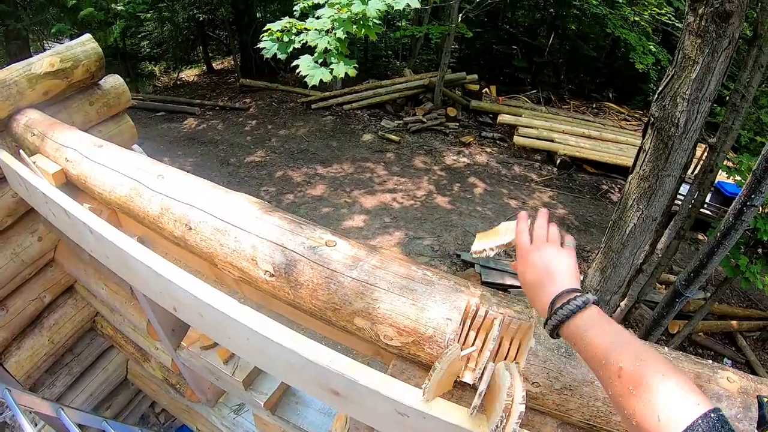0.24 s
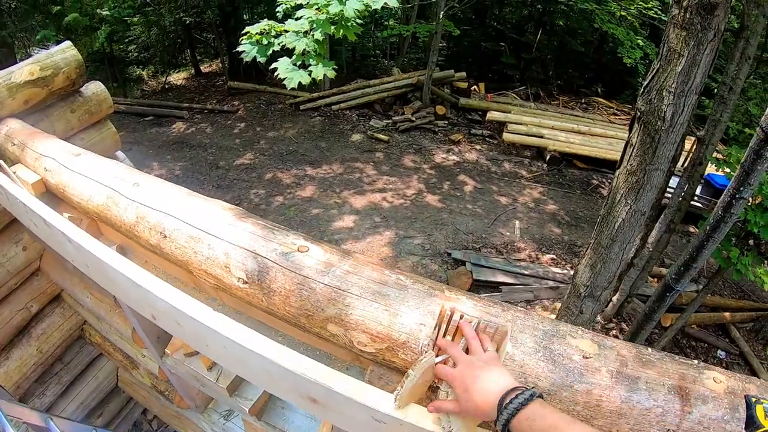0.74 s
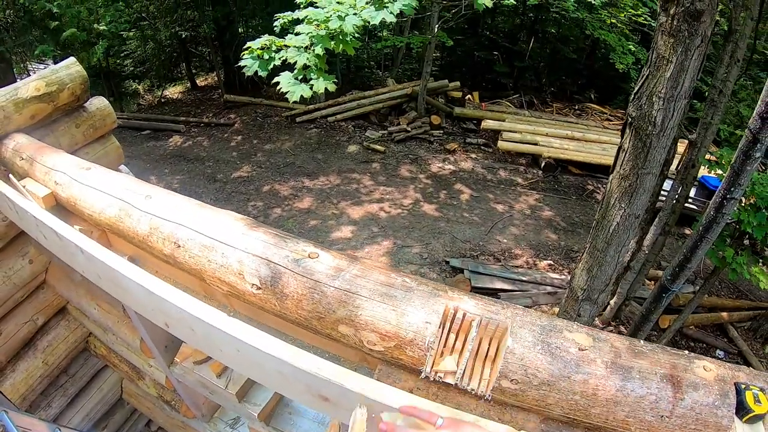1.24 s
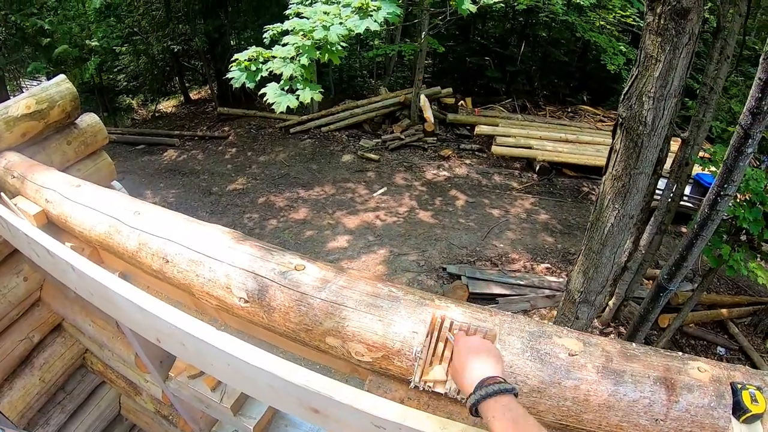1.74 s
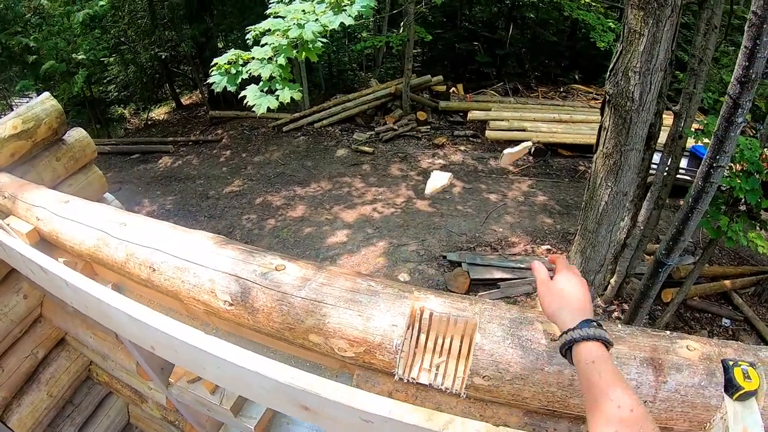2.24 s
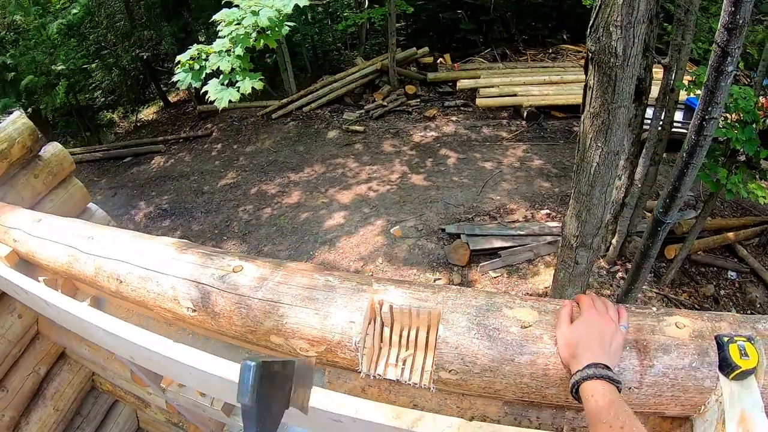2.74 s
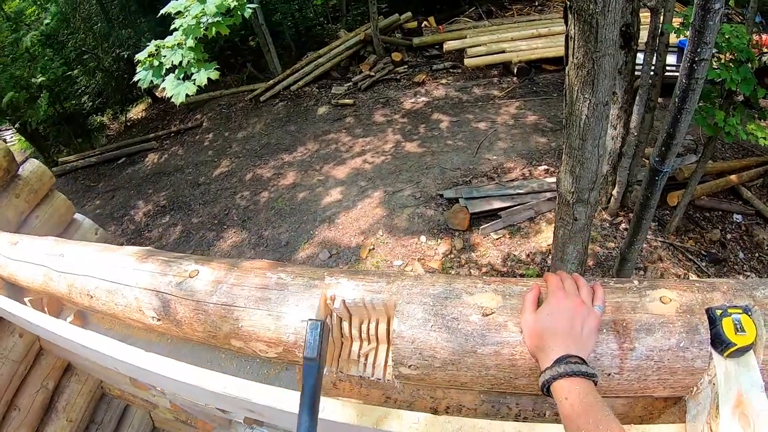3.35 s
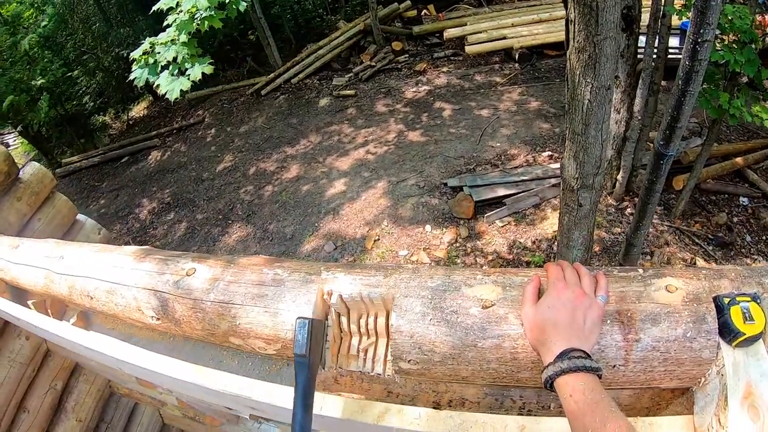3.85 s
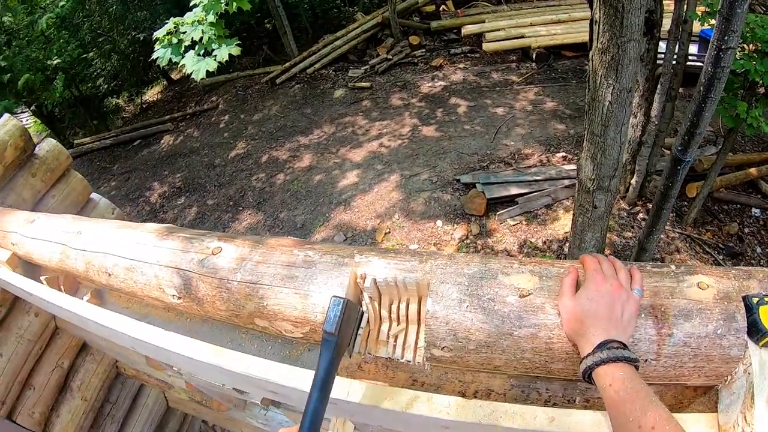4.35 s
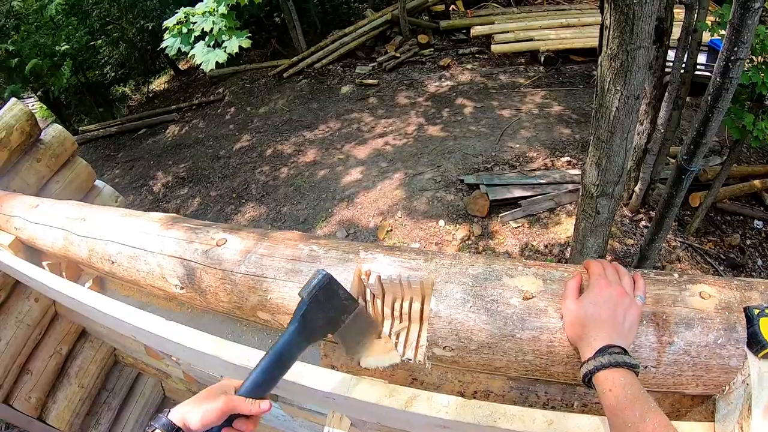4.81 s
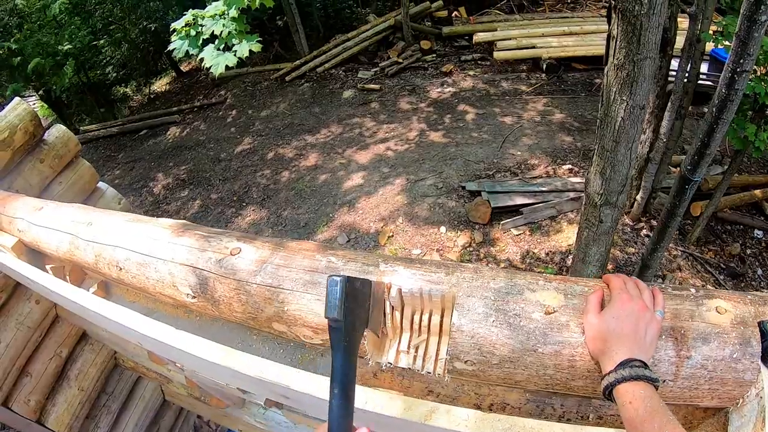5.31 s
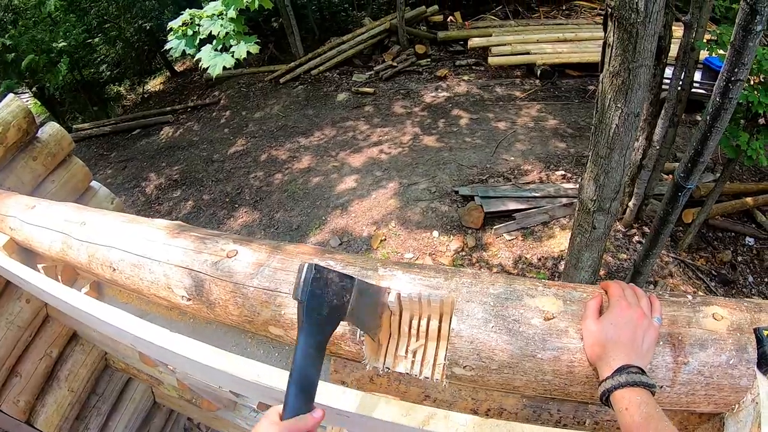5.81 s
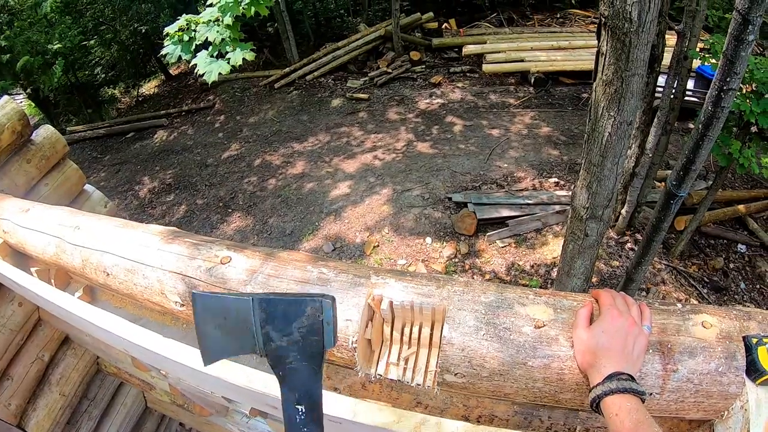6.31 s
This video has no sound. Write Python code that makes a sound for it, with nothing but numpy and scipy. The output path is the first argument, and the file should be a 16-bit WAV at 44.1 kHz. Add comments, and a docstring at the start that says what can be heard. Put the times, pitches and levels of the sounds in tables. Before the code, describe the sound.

Wood chips are tugged and snapped from a notched log, then a hatchet knocks, pries and cracks fibres, outdoors in a quiet yard.

```python
"""A hatchet knocks and levers blocks of wood out from between saw cuts in a log, an arm's length from a worn camera.
Fibres snap as short bursts of noise with close ringing modes; blows thump as decaying clatter and log modes.
Hand and blade scrape as grainy noise in swelling strokes, with creaks, splinter ticks and a faint steel ring.
Timber, log walls and trees return a faint noise-tail echo over quiet outdoor air with a low distant hum."""
import sys
import numpy as np
from scipy import signal
from scipy.fft import rfft, irfft
from scipy.io import wavfile
from scipy.ndimage import uniform_filter1d, minimum_filter1d

SR = 44100
rng = np.random.default_rng(int(sys.argv[2]) if len(sys.argv) > 2 else 0)


def transcribe(u):
    """Save the signal u as a 16-bit wav file named by the first command-line argument.

    u: samples, shape (n,) or (channels, n), limited to [-1, 1]; the rate is SR.
    q: integer samples, one column per channel.
    """
    v = np.clip(np.atleast_2d(u).T, -1, 1)
    q = np.round(v * 32767).astype(np.int16)
    wavfile.write(sys.argv[1], SR, q)


N = 289737

# Single snaps of wood and knocks of loose chips, close by; levels are rms over the first 4 ms.
# Each row: start in seconds, level in dB, ring in Hz, ring share 0-1 (capped at 0.6),
# tilt in dB per octave, left minus right in dB.
SNAPS = [(0.278, -33, 930, 0.8, -6, -9), (0.584, -45.5, 1350, 0.3, -2, -8),
         (0.929, -38, 920, 0.65, -4.5, -10), (1.17, -36.5, 1340, 0.1, -20, -20),
         (1.4617, -8.5, 784, 0.8, -17, -14), (1.9096, -21, 1160, 0.1, -14, -6),
         (1.9122, -16, 910, 0, 1.5, -2), (1.9658, -27.5, 3130, 0.34, -1.5, -1),
         (1.991, -19.5, 1080, 0.4, -9, -6), (2.0256, -16.5, 1650, 0.02, -2.5, -5),
         (2.028, -8, 1206, 0.7, -7.5, -4), (2.7505, -26.5, 1050, 0.06, -8, -2),
         (2.91, -31, 1010, 0.2, -12.5, -6), (3.191, -25, 1210, 0.55, -10, -7),
         (3.364, -37.5, 1750, 0.4, -8, 3), (3.408, -28, 2120, 0, 1.5, -2),
         (3.718, -41.5, 1210, 0.35, 2.5, -2), (3.923, -14.5, 1230, 0.05, -3, -1.5),
         (4.109, -26.5, 3170, 0.37, 16.5, -5), (4.174, -15, 3470, 0.13, 6, -3),
         (4.1904, -23, 1390, 0.12, -5.5, 3), (4.201, -19, 1280, 0.53, 9.5, -2),
         (4.3301, -28.5, 2980, 0.2, -1, 0), (4.3996, -19, 3580, 0.46, 12, -2),
         (4.4575, -37.5, 910, 0.22, 1, -3), (4.551, -41.5, 1130, 0, -3, 1),
         (4.568, -39.5, 730, 0.27, -11, -3), (4.686, -17, 3850, 0.2, 2.5, 0), (4.712, -22, 1730, 0, -6, 2),
         (4.734, -26, 4410, 0.7, 8, 0), (4.822, -24.5, 3130, 0.7, 6.5, 14), (4.964, -31, 2030, 0.58, 0, -1),
         (5.283, -46.5, 1103, 0.4, 1.5, -2), (5.399, -30, 3730, 0.57, -2.5, -3),
         (5.4294, -30.5, 1155, 0.13, -7.5, -9), (5.55, -46, 3320, 0.7, -1.5, -2),
         (5.72, -21.5, 3580, 0.65, 3, -3.5), (5.735, -19, 3710, 0.8, 1, -4),
         (5.804, -29, 3220, 0.66, -2.5, -5), (6.16, -45, 1360, 0.04, -1, -2),
         (6.447, -38, 2010, 0.23, -6.5, -6)]
# A run of fibres tears as the wood is levered. Each row: start in seconds, length in seconds,
# level in dB, ring in Hz, ring share 0-1 (capped at 0.6), tilt in dB per octave.
TEARS = [(0.232, 0.023, -26.5, 980, 0.63, 1.5), (4.1188, 0.0055, -20.5, 5020, 0.18, 6.5),
         (4.1326, 0.0098, -19.5, 4210, 0.3, 6), (4.152, 0.022, -26, 4460, 0.56, 5),
         (4.392, 0.02, -22.5, 3180, 0.27, 1.5), (4.818, 0.015, -16.5, 3520, 0.54, 6),
         (5.712, 0.018, -21, 3550, 0.87, 3.5), (5.744, 0.0044, -30, 2270, 0.4, 5)]
# Hard knocks of blade or block on wood that carry across the yard. Each row: columns as in SNAPS.
CLACKS = [(2.4945, -17, 1900, 0.6, 2.5, -1), (2.64, -32, 1540, 0.15, -1, 0),
          (3.337, -37, 2720, .05, 11.5, 0), (6.2581, -18, 2490, 0.33, 6, -6.5)]
# Dry wood singing on after a hard knock. Each row: mode in Hz, level in dB re the knock, t60 in seconds.
CLACK_MODES = [(2350, -12, 0.21), (2610, -19, 0.23), (3060, -25.5, 0.55), (3260, -32, 0.84)]
# Colour of a snap. Each row: frequency in Hz, relative density in dB per Hz.
SNAP_COLOUR = [(150, -54.5), (500, -26), (800, -6.5), (1250, 4.5), (2200, 2), (3600, 3), (5000, -3),
               (7200, -12.5), (9000, -13.5), (11500, -25), (16000, -38)]
# Colour of a hard knock. Each row: frequency in Hz, relative density in dB per Hz.
CLACK_COLOUR = [(300, -16), (1200, 2.5), (2700, 5), (3600, 0.5), (6300, -15), (10000, -37.5), (14000, -64)]
# Blows that shake the log. Each row: start in seconds, body level in dB, knock level in dB re the body,
# basic t60 in seconds (each band scales it).
THUMPS = [(0.411, -41.5, 5, 0.5), (0.655, -45, 8.5, 0.45), (1.074, -46, 1, 0.67), (1.356, -54.5, 9, 0.1),
          (1.4599, -16, -8, 0.16), (1.496, -29, -9, 0.4), (2.025, -25, -6, 0.22),
          (2.308, -43.5, -22, 0.088), (2.4116, -50.5, -0.5, 0.023), (2.6375, -49, 6, 0.026),
          (2.749, -44, 8.5, 0.062), (3.187, -42.5, -2.5, 0.67), (3.2652, -40, -8, 0.91),
          (3.757, -39, -2, 0.24), (3.924, -36, -9.5, 0.61), (4.194, -44.5, 2.5, 0.67),
          (4.33, -37.5, -14.5, 0.45), (4.371, -32.5, -4.5, 0.63), (4.487, -48, -1, 0.62),
          (4.684, -48.5, 10, 0.56), (4.8, -24.5, -3, 0.36), (5.209, -66, 14, 0.16), (5.427, -51.5, 6, 0.88),
          (5.581, -47, -25, 0.09), (5.774, -29, -6.5, 0.46), (5.912, -32, -11.5, 0.21),
          (6.157, -43, -9, 0.53), (6.255, -41, -1, 0.24)]
# The log and its supports. Each row: mode in Hz, relative level in dB, t60 in seconds.
LOG_MODES = [(64, 4.5, 0.066), (124.1, 2, 0.3), (157.7, -1, 0.43), (204.3, 7, 0.16), (217.6, 3.5, 0.29),
             (268, 8.5, 0.084), (322.3, -2, 0.33), (366, 5, 0.071), (479.5, 6, 0.11), (622.5, -0.5, 0.19),
             (839.5, -1, 0.11)]
# Deep boom of the log on its supports. Each row: body level in dB, boom level in dB.
BOOM = [(-66, -75.5), (-39, -61.5), (-33, -39.5), (-25.5, -44.5), (-27, -32.5)]
# The log rocks on its supports after a heavy heave. Each row: start in seconds, length in seconds, level in dB.
ROCKS = [(4.821, 0.27, -54), (5.805, 0.098, -36.5), (5.882, 0.19, -50)]
# Strokes of hand and blade over the wood. Each row: start in seconds, length in seconds, level in dB,
# hiss in dB re that level, hollow low range in dB re that level.
STROKES = [(0, 0.015, -45, -13.5, -0.5), (0.061, 0.25, -45, -10, 2.5), (0.37, 0.013, -40.5, -3.5, -6),
           (0.606, 0.38, -50, -9, 2), (0.819, 0.15, -44.5, -17, 0), (0.973, 0.12, -43, -9.5, -1),
           (1.137, 0.11, -46.5, -8.5, -5), (1.496, 0.66, -44, -12, -7.5), (1.926, 0.087, -42, -13, 4.5),
           (1.974, 0.48, -46, -17, -3.5), (2.495, 0.22, -53, 4, 2.5), (2.807, 0.33, -54.5, -7.5, 3),
           (3.157, 0.18, -54, -12, 3), (3.322, 0.061, -42.5, -9, -3.5), (3.413, 0.024, -39, -3, -6),
           (3.474, 0.071, -49.5, -4.5, 0.5), (3.568, 0.96, -59, 0.5, -5), (3.846, 0.089, -43, -7, -2.5),
           (4.288, 0.03, -38, -10, -5), (4.588, 0.36, -43, -13, -3), (5.033, 0.043, -48, -18, -25),
           (5.389, 0.064, -51.5, -29, 9), (5.555, 0.014, -55, -5, -3), (5.627, 0.037, -51, -15, -13),
           (5.749, 0.056, -47, -12, 8.5)]
# Colour of the rasp. Each row: frequency in Hz, relative density in dB per Hz.
RUB_COLOUR = [(50, -30.5), (160, 5.5), (900, 3.5), (2300, -2.5), (3500, -2.5), (4800, -7.5), (6500, -16.5),
              (10000, -41)]
# Colour of the hiss of sliding. Each row: frequency in Hz, relative density in dB per Hz.
HISS_COLOUR = [(2500, -7.5), (5000, 1.5), (6000, 1.5), (9300, 0.5), (11200, -13), (16000, -27)]
# Resonances of a block drawn out of its cut. Each row: centre in Hz, width in Hz, relative level in dB.
BLOCK = [(920, 550, 8.5), (1410, 330, 3.5), (2160, 240, 1.5), (3560, 1900, 1.5)]
# The wedged blade grinds in uneven slips. Each row: start in seconds, length in seconds, level in dB,
# lower resonance in Hz, upper resonance in Hz.
CREAKS = [(3.499, 0.061, -56, 1090, 3270), (3.659, 0.075, -54.5, 1190, 3400),
          (5.775, 0.0636, -39, 3220, 4100)]
# Faint ring of the steel head. Each row: mode in Hz, level in dB before swell and decay, t60 in seconds.
HEAD_MODES = [(2140, -43, 0.91), (2860, -53.5, 1.9)]
# Colour of the echo. Each row: frequency in Hz, gain in dB.
ECHO_COLOUR = [(60, -12), (200, -4.5), (1500, -4.5), (3000, -7.5), (14000, -12.5)]
# Colour of the outdoor air. Each row: frequency in Hz, relative density in dB per Hz.
AIR_COLOUR = [(25, 3.5), (90, -18), (200, 7), (1000, -13.5), (3200, -12), (10000, -26), (15000, -70.5)]
# Distant hum. Each row: time in seconds, level in dB.
HUM = [(.3, -51.5), (1.2, -58.5), (3, -68.5)]
# How unlike the two microphone ports hear a sound. Each row: frequency in Hz, side minus mid in dB.
WIDTH = [(60, -13.5), (250, -18.5), (700, -6), (1400, -2), (3000, -10.5), (5000, -6.5), (8000, 2),
         (15000, 2.5)]

STROKE_SWELL, STROKE_T60_S = 0.32, 0.21  # share of its length over which a stroke swells; release
LEAD_DB, LEAD_RISE_S = -22.5, 0.064  # short soft swell of noise leading into a snap, re the snap; 60 dB rise
DRAG_DB, DRAG_T60_S = -5, 0.33  # scrape after a blow, re its knock
PULL_END_S, PULL_DB = 0.2456, -26.5  # a block comes free of its saw cut
PULL_RISE_S, PULL_T60_S = 0.25, 0.048  # rise and release over 60 dB
LIFT_AT_S = 2.754  # the hatchet is picked up
TOP_HZ = 16000  # highest frequency the camera keeps


def snaps(table, spectrum, break_db, ring_length, t60_s, halving_db, mode_spread=0.067, size=4096):
    """Wood gives way in a few ms, the freed piece rings in close modes; returns near sound and what carries afar."""
    near, afar = np.zeros((2, N)), np.zeros((2, N))
    t = np.arange(size) / SR
    span = .004  # seconds over which the level is set
    for s, db, hz, share, tilt, pan_db in table:
        # the harder the break, the sooner it is over; t60_s holds at -11.5 dB
        t60 = t60_s * .5 ** ((db + 11.5) / halving_db)
        octaves = np.log2(np.clip(freqs(size), 600, 8000) / 2500)
        colour = gains(spectrum, size) * undb(tilt * octaves)
        # tearing has a bounded force, so the burst is dense rather than spiky
        tear = np.tanh(noise(size)) * (fade(t, t60) + undb(break_db) * fade(t, span))
        crack = opening(shape(tear, colour), span)
        detune = np.array([[-1], [0], [1]]) + rng.uniform(-0.59, 0.69, (3, 1))
        modes = hz * (1 + mode_spread * detune)
        ring = np.sin(2 * np.pi * modes * t).sum(axis=0) * fade(t, t60 * ring_length)
        ring = opening(band(ring, 280, 6400), span)
        share = np.clip(share, 0, .6)
        piece = opening(np.sqrt(1 - share) * crack + np.sqrt(share) * ring, span)
        add(near, s, undb(db) * pan(pan_db) * piece)
        # summed over all directions, only the broad colour is left
        pulse = opening(shape(signal.unit_impulse(size), colour), span)
        add(afar, s, undb(db) * pulse[None])
    return near, afar


def tears(edge_db=-4, scatter_db=-3.0, jitter_s=.0004, pitch_spread=0.013, pan_db=0.0, pan_spread_db=3, count=4):
    """Fibres give way one after another, on average hardest in the middle of the run; rows as in SNAPS."""
    rows = []
    for s, length, db, hz, share, tilt in TEARS:
        fibres = rng.standard_normal((count, 4))
        for along, (late, loud, pitch, side) in zip(np.linspace(0, 1, count), fibres):
            start = s + along * length + jitter_s * late
            level = db + edge_db * (2 * along - 1) ** 2 + scatter_db * loud
            ring_hz = hz * (1 + pitch_spread * pitch)
            rows.append((start, level, ring_hz, share, tilt, pan_db + pan_spread_db * side))
    return rows


def singing(spread=0.012):
    """Each hard knock leaves close pairs of modes ringing, a little different from spot to spot."""
    out, t = np.zeros((2, N)), np.arange(SR // 2) / SR
    for s, knock_db, *_ in CLACKS:
        pairs = rng.standard_normal((len(CLACK_MODES), 2, 1))
        for (hz, db, t60), pair in zip(CLACK_MODES, pairs):
            ring = np.sin(2 * np.pi * hz * (1 + spread * pair) * t).mean(axis=0) * fade(t, t60)
            add(out, s, undb(knock_db + db) * ring[None])
    return out


def thumps(modes_db=1.5, knock_length=0.7, boom_length=1.24, knock_pan_db=-4,
           punch_db=4, punch_hz=200, punch_t60=0.17, size=22050):
    """Each blow shoves the log, then rings its modes amid a dense dull clatter that dies sooner in higher bands."""
    out, t = np.zeros((2, N)), np.arange(size) / SR
    span = .04  # seconds over which the level is set
    punch = opening(band(np.sin(2 * np.pi * punch_hz * t) * fade(t, punch_t60), 74, 1000), span)
    for s, body_db, knock_db, t60 in THUMPS:
        boom_db = np.interp(body_db, *np.transpose(BOOM))
        # every blow lands on another spot, so the modes answer in other proportions
        spot = rng.standard_normal((len(LOG_MODES), 2))
        ring = np.zeros(size)
        for (hz, db, decay), (louder, higher) in zip(LOG_MODES, spot):
            mode_hz = hz * (1 + 0.013 * higher)
            ring += undb(db + louder) * np.sin(2 * np.pi * mode_hz * t) * fade(t, decay)
        # a gentle blow lands softly and swells over a few ms
        rise = np.minimum(t / np.interp(body_db, [-42, -25], [.005, .001]), 1)
        clatter, ring = noise(size) * rise, ring * rise
        # boom, body, knock: low Hz, high Hz, level dB, share of t60, left minus right dB
        bands = ((50.3, 157, boom_db, boom_length, 0.018),
                 (143.0, 419, body_db, 0.76, 0.0087),
                 (409, 834, body_db + knock_db, knock_length, knock_pan_db))
        for lo, hi, db, length, pan_db in bands:
            part = opening(band(clatter * fade(t, t60 * length), lo, hi, order=3), span)
            part = part + undb(modes_db) * opening(band(ring, lo, hi, order=3), span)
            add(out, s, undb(db) * pan(pan_db) * opening(part, span))
        # the shove grows faster than the ringing, so only heavy blows punch
        add(out, s, undb(2.04 * body_db + punch_db) * punch[None])
    return out


def rocking(lo_hz=36, hi_hz=92):
    """A deep rumble swells and settles as the log rolls a little on its supports."""
    out = np.zeros((2, N))
    for s, length, db in ROCKS:
        n = int(length * SR)
        rumble = unit(band(noise(SR), lo_hz, hi_hz)[:, -n:])
        add(out, s, undb(db) * rumble * signal.windows.tukey(n, .5))
    return out


def sliding(drag_hiss_db=-12):
    """Strength over time of rasp, hiss and hollow range: strokes, lead-in before a snap, drag after a blow."""
    t = np.arange(N) / SR
    rasp, hiss, hollow, extra = np.zeros((4, N))  # powers, so that overlapping strokes add up
    for s, length, db, hiss_db, hollow_db in STROKES:
        swell = np.clip((t - s) / (STROKE_SWELL * length), 0, 1)
        stroke = undb(db) * swell * fade(np.clip(t - s - length, 0, 1), STROKE_T60_S)
        rasp += stroke ** 2
        hiss += (undb(hiss_db) * stroke) ** 2
        hollow += (undb(hollow_db) * stroke) ** 2
    for s, db, *_ in SNAPS:
        before = (t < s) & (t > s - LEAD_RISE_S)
        extra[before] += (undb(db + LEAD_DB) * fade(s - t[before], LEAD_RISE_S)) ** 2
    for s, body_db, knock_db, _ in THUMPS:
        after = (t > s) & (t < s + DRAG_T60_S)
        extra[after] += (undb(body_db + knock_db + DRAG_DB) * fade(t[after] - s, DRAG_T60_S)) ** 2
    return np.sqrt(rasp + extra), np.sqrt(hiss + undb(drag_hiss_db) ** 2 * extra), np.sqrt(hollow + extra)


def catches(clump_db=2.5):
    """Uneven grip of a sliding surface, in dB: it changes every few ms and clumps over the ridges of the wood."""
    quick = 2.4 * wander(count=800)
    return quick + clump_db * wander(count=120)


def rubbing(level, hiss, hollow, grain_db=2.5, patch_db=1.5, pan_db=-3.0):
    """Skin and steel slide over rough grain: tiny uneven slips merge into a rasp that catches and frees."""
    slips = np.repeat(np.minimum(rng.exponential(size=N // 32 + 1), 4), 32)[:N]
    grain = undb(grain_db * slips + catches())
    # the point of contact moves, so each range of the wood swells on its own
    edges = (50, 400, 600, 850, 1200, 1700, 2400, 3200, 4200, 12000)  # Hz
    ranges = []
    for lo, hi in zip(edges, edges[1:]):
        patch = undb(patch_db * wander(count=330))
        ranges.append(band(noise(N) * grain * patch, lo, hi, order=3))
    halves = np.array([sum(ranges[:4]), sum(ranges[4:])])  # below and above 1200 Hz
    low, high = shape(halves, gains(RUB_COLOUR, N))
    rasp = (hollow * low + level * high) / np.std(low + high)
    fizz = unit(shape(noise(N) * grain, gains(HISS_COLOUR, N)))
    return pan(pan_db) * (rasp + hiss * fizz)


def pull(slip_db=0.5, hiss_db=-17, pan_db=-5.5):
    """The block judders along the saw cut; each slip rings it, louder and louder until it comes free."""
    t = np.arange(N) / SR - PULL_END_S
    slips = np.repeat(np.minimum(rng.exponential(size=N // 48 + 1), 3), 48)[:N]
    force = noise(N) * undb(slip_db * slips)
    ring = np.zeros((2, N))
    for hz, width, db in BLOCK:
        ring += undb(db) * unit(band(force, hz - width / 2, hz + width / 2))
    fizz = unit(shape(force, gains(HISS_COLOUR, N)))
    effort = fade(np.maximum(-t, 0), PULL_RISE_S) * fade(np.maximum(t, 0), PULL_T60_S)
    return undb(PULL_DB) * pan(pan_db) * effort * (unit(ring) + undb(hiss_db) * fizz)


def creaks(slip_hz=105, uneven_db=5, slip_t60=0.027, width=0.095, pan_db=-2):
    """Steel sticks and slips in the cut; every slip is a gritty puff into two resonances of the wood."""
    out = np.zeros((2, N))
    for s, length, db, *resonances in CREAKS:
        n = int(length * SR)
        rate = slip_hz * undb(uneven_db * wander(count=600)[:n])
        turn = np.cumsum(rate) / SR % 1  # progress from one slip to the next
        force = noise(SR)[:, :n] * fade(turn / slip_hz, slip_t60) * signal.windows.tukey(n, .2)
        force = np.pad(force, ((0, 0), (0, n)))  # room to ring out
        ring = sum(opening(band(force, hz * (1 - width), hz * (1 + width)), length) for hz in resonances)
        add(out, s, undb(db) * pan(pan_db) * opening(ring, length))
    return out


def crumbs(level, most_db=-43, least_db=-6, range_db=10, count=280):
    """Tiny splinters tick under the sliding hand and blade, louder the harder they rub, up to a limit; SNAPS rows."""
    when, loud, pitch = rng.random((count, 3)).T
    rub_db = 20 * np.log10(level[(when * N).astype(int)] + 1e-9)
    tick_db = np.minimum(rub_db, most_db) + least_db + range_db * loud ** 2
    ring_hz = 700 * 5 ** pitch
    return [(s, db, hz, .5, -3, -2) for s, db, hz in zip(when * N / SR, tick_db, ring_hz)]


def steel(waver_hz=75, swell_s=0.13, waver_db=-2.0, size=44100):
    """The hatchet head rings on faintly after it is lifted, as narrow noise bands wavering as it moves."""
    out, t = np.zeros((2, N)), np.arange(size) / SR
    for hz, db, t60 in HEAD_MODES:
        waver = undb(waver_db * wander(count=150)[:size])
        ring = unit(band(noise(size), hz - waver_hz, hz + waver_hz) * waver)
        add(out, LIFT_AT_S, undb(db) * ring * np.minimum(t / swell_s, 1) * fade(t, t60))
    return out


def yard(x, near_db=-13, near_t60=0.26, wall_s=0.018, wall_db=-14, wall_t60=0.036,
         far_db=-15, far_t60=0.61, treble_t60=0.31, size=52920):
    """Scatter from the timber close by, a bounce off wall and ground, then the tail from the trees."""
    t = np.arange(size) / SR
    near = noise(size) * fade(t, near_t60) * (t > .003)
    wall = noise(size) * fade(np.abs(t - wall_s), wall_t60) * (t > wall_s)
    trees = noise(size)
    far = band(trees, 57, 8700) * fade(t, far_t60) + band(trees, 4500, 10000) * fade(t, treble_t60)
    far = far * np.minimum(t / 0.007, 1)
    # the levels balance the three parts before the echo's colour is laid on
    echo = undb(near_db) * unit(near) + undb(wall_db) * unit(wall) + undb(far_db) * unit(far)
    echo = shape(echo / np.sqrt(size), gains(ECHO_COLOUR, size))
    return signal.fftconvolve(x.mean(axis=0)[None], echo, axes=1)[:, :N]


def outdoors(air_db=-63, hum_hz=164.2, upper_hz=217.6, upper_db=-67, waver=0.008, flutter_db=2.0):
    """Still air among trees, with two slightly wavering tones of a machine far off."""
    air = unit(shape(noise(N), gains(AIR_COLOUR, N)))
    clock = np.cumsum(1 + waver * wander(count=30)) / SR  # shared by both tones
    hum = unit(np.sin(2 * np.pi * hum_hz * clock) * undb(flutter_db * wander(count=60)))
    upper = unit(np.sin(2 * np.pi * upper_hz * clock) * undb(flutter_db * wander(count=60)))
    hum_db = np.interp(np.arange(N) / SR, *np.transpose(HUM))
    return undb(air_db) * air + undb(hum_db) * hum + undb(upper_db) * upper


def noise(n):
    """Noise at the two microphone ports: a common mid plus an opposed side, balanced per frequency by WIDTH."""
    mid, side = rfft(rng.standard_normal((2, n)))
    w = gains(WIDTH, n)
    return irfft(np.array([mid + w * side, mid - w * side]) / np.sqrt(1 + w ** 2), n)


def wander(count):
    """A slow random curve of spread near 1 through count random points."""
    return np.interp(np.arange(N), np.linspace(0, N, count), rng.standard_normal(count))


def undb(db):
    """Decibels to gain."""
    return 10 ** (np.asarray(db) / 20)


def unit(x):
    """Scale to rms 1."""
    return x / np.sqrt(np.mean(x ** 2) + 1e-20)


def opening(x, span):
    """Scale so that the first span seconds have rms 1."""
    return x / np.sqrt(np.mean(x[..., :int(span * SR)] ** 2) + 1e-20)


def fade(t, t60):
    """Exponential decay, 60 dB down after t60 (at least 1 ms)."""
    return np.exp(-np.log(1000) * t / max(t60, 1e-3))


def freqs(n):
    """Frequencies of an n-point spectrum, at least 1 Hz."""
    return np.maximum(np.arange(n // 2 + 1) * SR / n, 1)


def gains(points, n):
    """Gain per frequency from (Hz, dB) points."""
    hz, db = np.transpose(points)
    return undb(np.interp(np.log(freqs(n)), np.log(hz), db))


def shape(x, gain):
    """Causal (minimum-phase) filter with the given gain per frequency."""
    n = x.shape[-1]
    cepstrum = irfft(np.log(gain + 1e-6), n)
    # folding the cepstrum forward in time makes the filter causal
    cepstrum[1:n // 2] *= 2
    cepstrum[n // 2 + 1:] = 0
    return irfft(rfft(x) * np.exp(rfft(cepstrum)), n)


def band(x, lo_hz, hi_hz, order=2):
    """Butterworth band-pass."""
    return signal.sosfilt(signal.butter(order, [lo_hz, hi_hz], "band", fs=SR, output="sos"), x)


def pan(db):
    """Left and right gains of equal total power, db apart."""
    return unit(undb(np.array([[db], [-db]]) / 2))


def add(out, s, x):
    """Mix x into out at time s."""
    i = max(int(s * SR), 0)
    out[:, i:i + x.shape[-1]] += x[:, :max(N - i, 0)]


def scene():
    """The work on the log, its echo and the background."""
    level, hiss, hollow = sliding()
    snap, snap_afar = snaps(SNAPS, SNAP_COLOUR, break_db=1, ring_length=1.0, t60_s=0.02, halving_db=21.5)
    tear, tear_afar = snaps(tears(), SNAP_COLOUR, break_db=-14.0, ring_length=0.6, t60_s=0.014, halving_db=86.0)
    crumb, _ = snaps(crumbs(level), SNAP_COLOUR, break_db=-10.5, ring_length=0.99, t60_s=0.0036, halving_db=79)
    clack, clack_afar = snaps(CLACKS, CLACK_COLOUR, break_db=-6, ring_length=1.0, t60_s=0.026, halving_db=14.0)
    dull = thumps()
    rub = rubbing(level, hiss, hollow) + pull() + creaks()
    echo = yard(snap_afar + tear_afar + undb(11.5) * clack_afar + undb(-0.5) * dull + undb(-9.5) * rub)
    work = snap + tear + crumb + clack + singing() + dull + rocking() + rub + steel()
    return work + echo + outdoors()


def record(dry, size=128):
    """The camera's limiter holds the peaks at full scale, then a steep low-pass cuts the top."""
    gain = 1 / np.maximum(np.abs(dry).max(axis=0), 1)
    gain = uniform_filter1d(minimum_filter1d(gain, size), size)
    return signal.sosfilt(signal.ellip(8, .2, 70, TOP_HZ, fs=SR, output="sos"), dry * gain)


dry = scene()
out = record(dry)
transcribe(out)
```